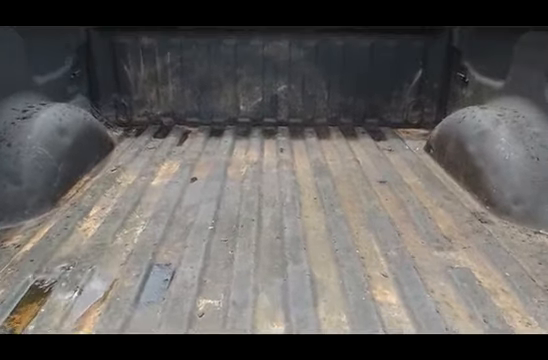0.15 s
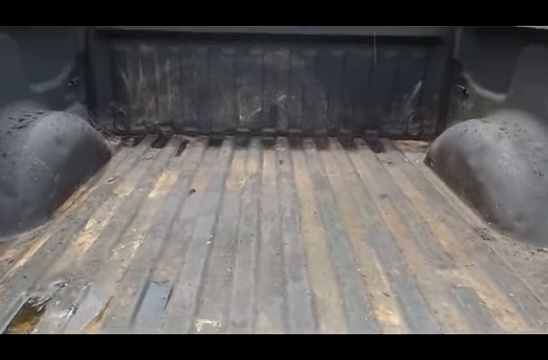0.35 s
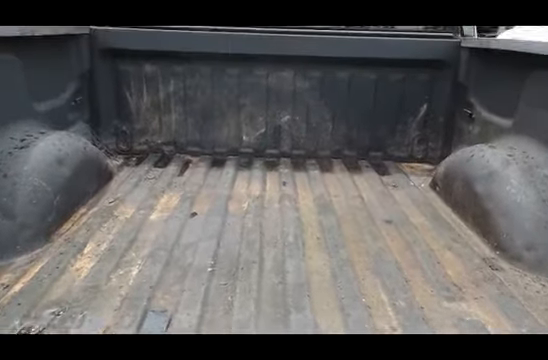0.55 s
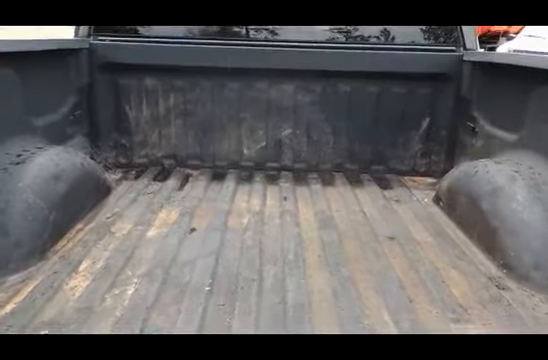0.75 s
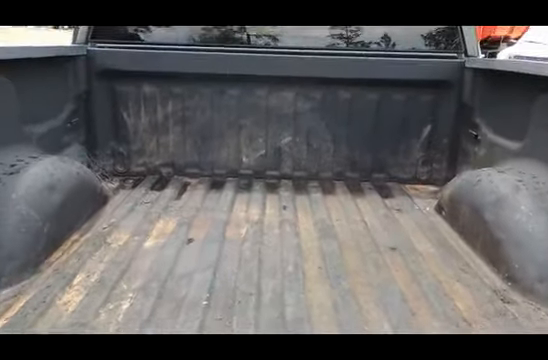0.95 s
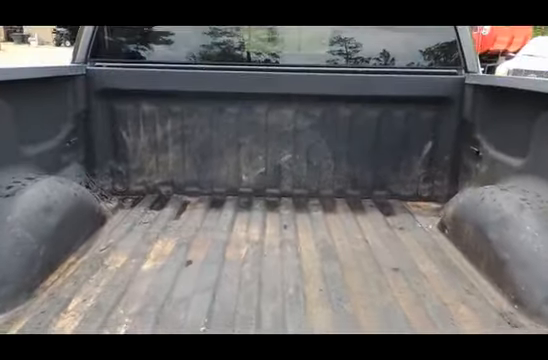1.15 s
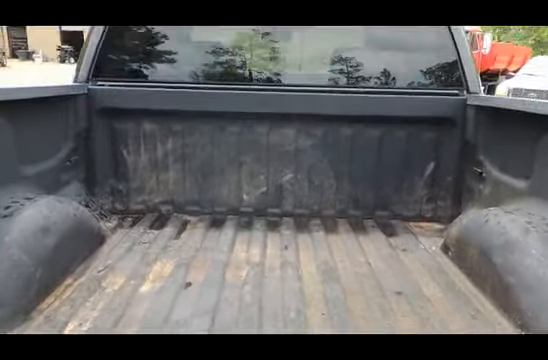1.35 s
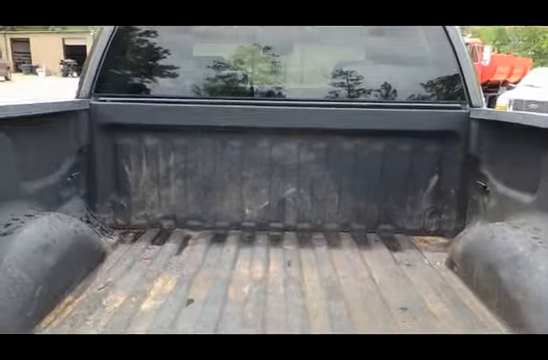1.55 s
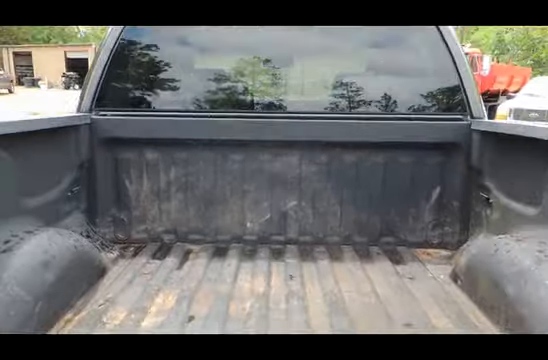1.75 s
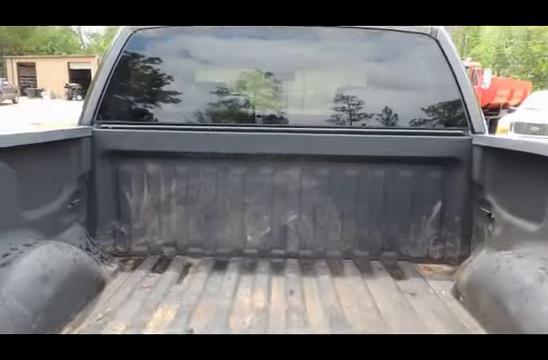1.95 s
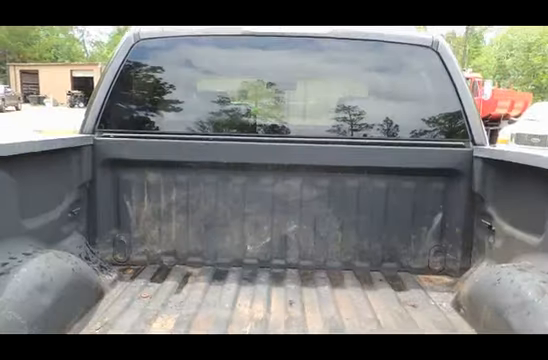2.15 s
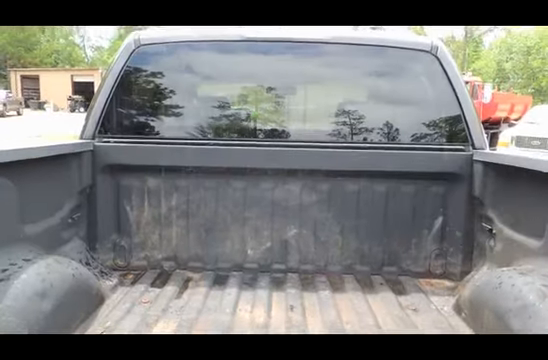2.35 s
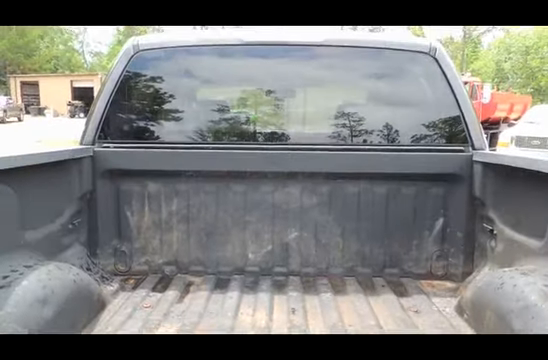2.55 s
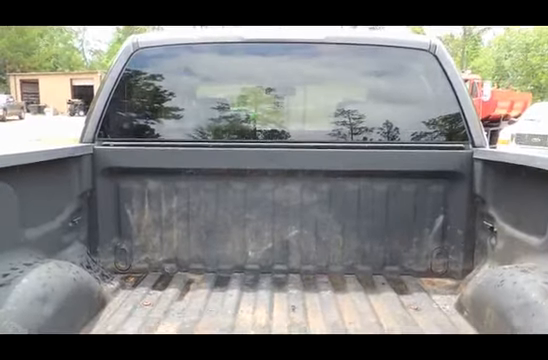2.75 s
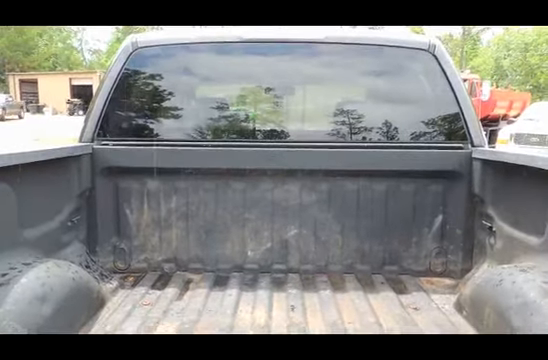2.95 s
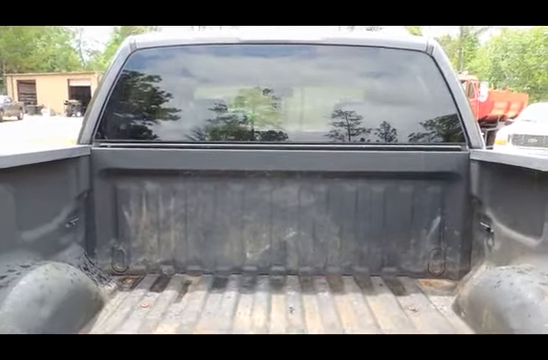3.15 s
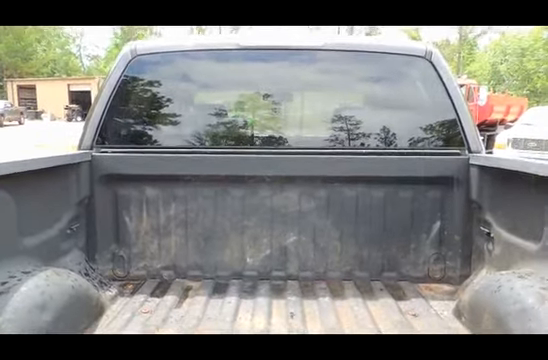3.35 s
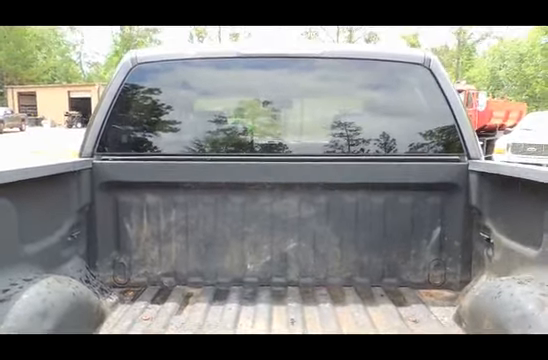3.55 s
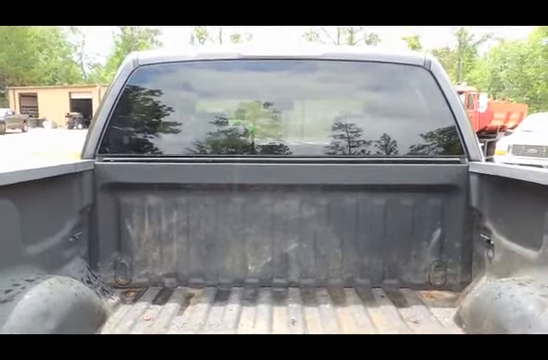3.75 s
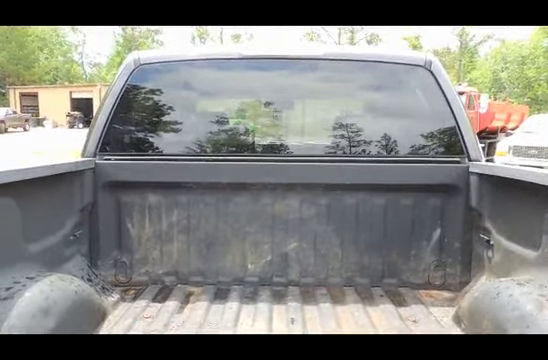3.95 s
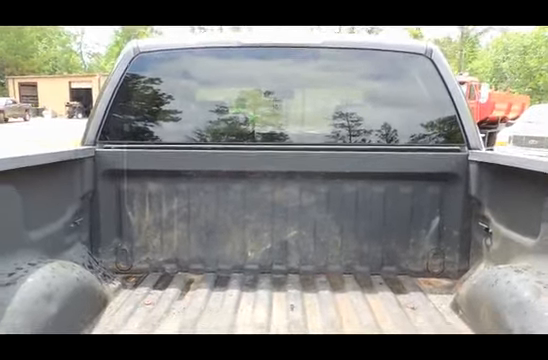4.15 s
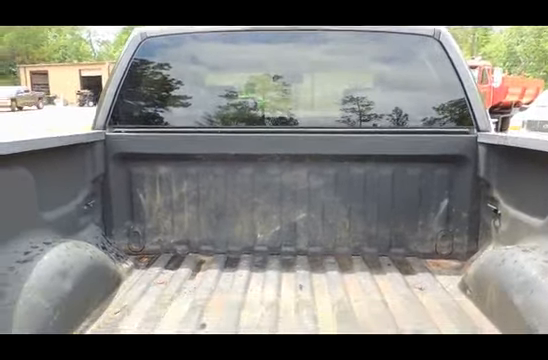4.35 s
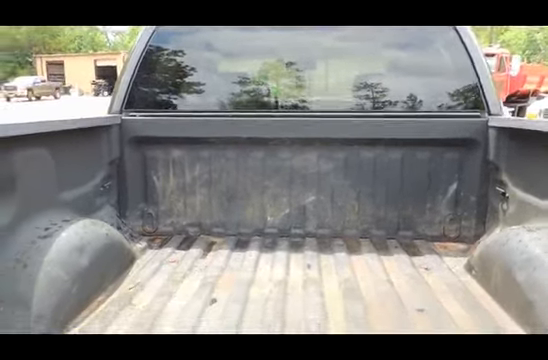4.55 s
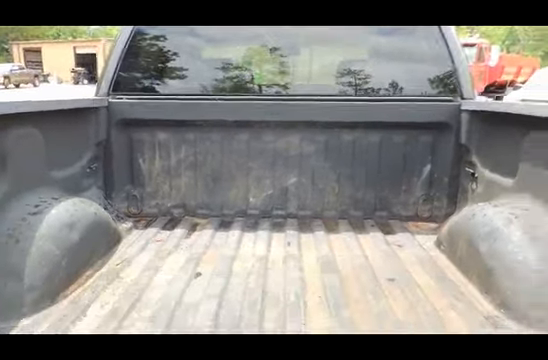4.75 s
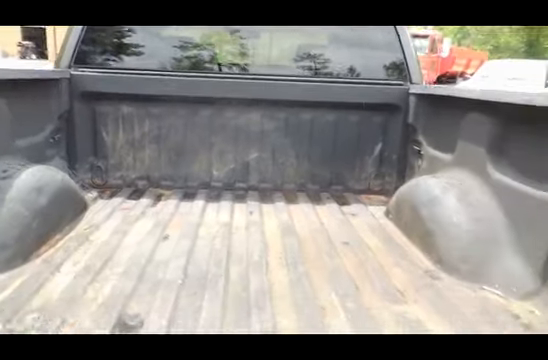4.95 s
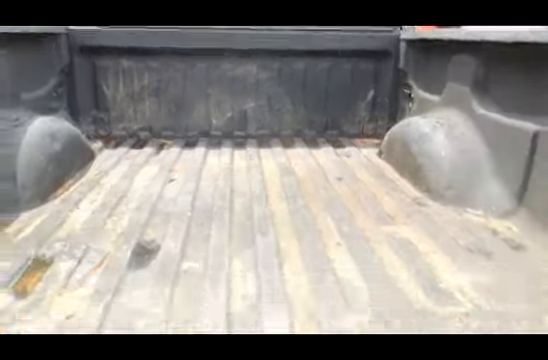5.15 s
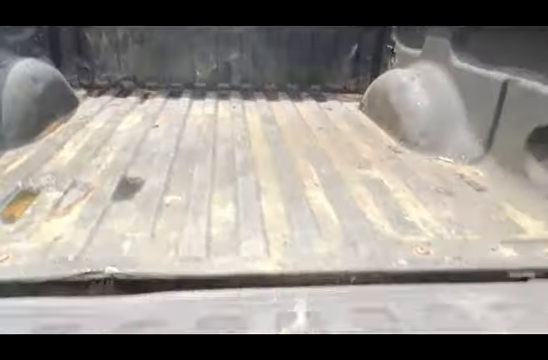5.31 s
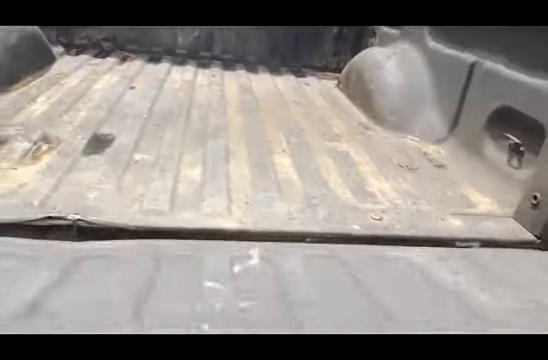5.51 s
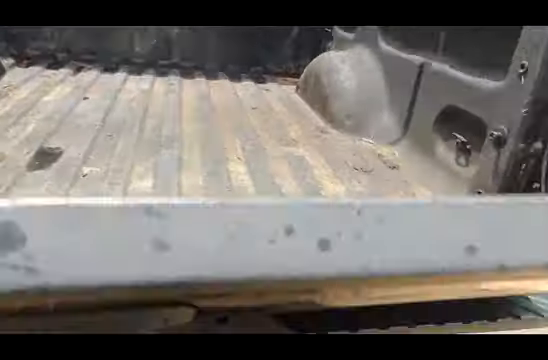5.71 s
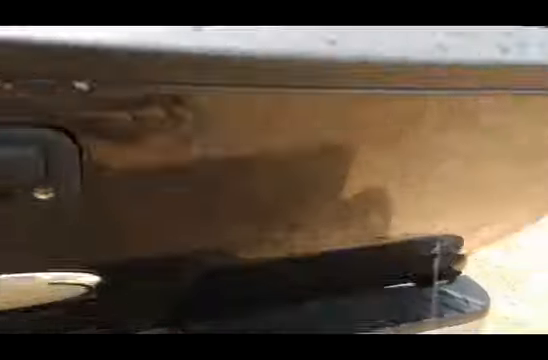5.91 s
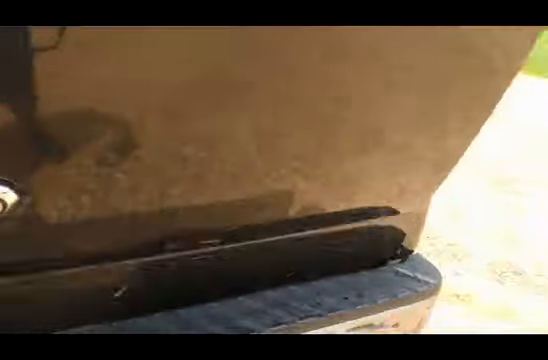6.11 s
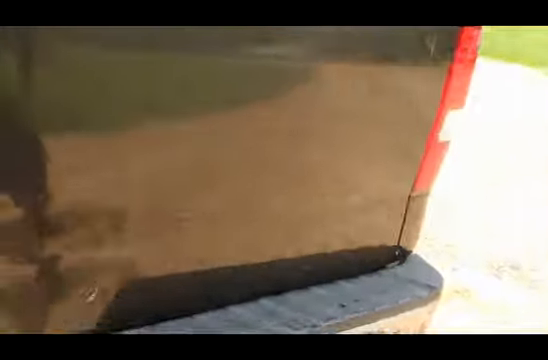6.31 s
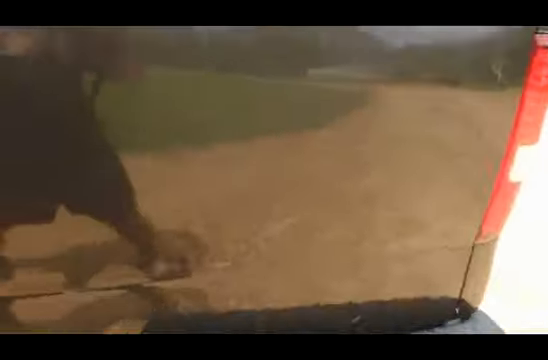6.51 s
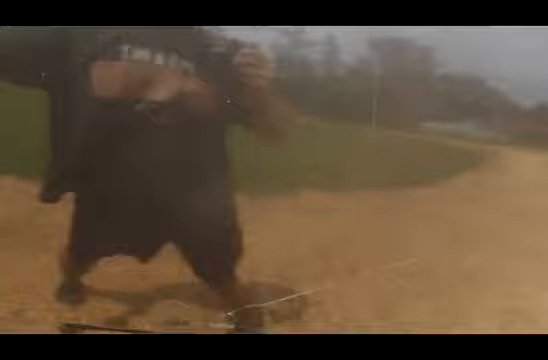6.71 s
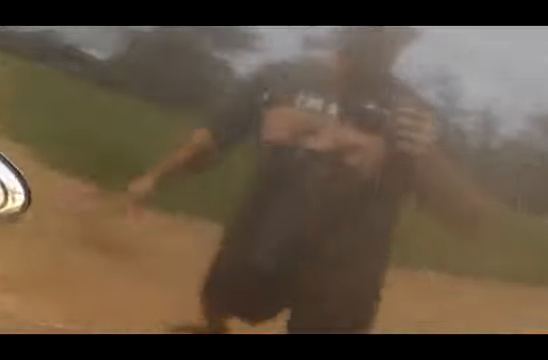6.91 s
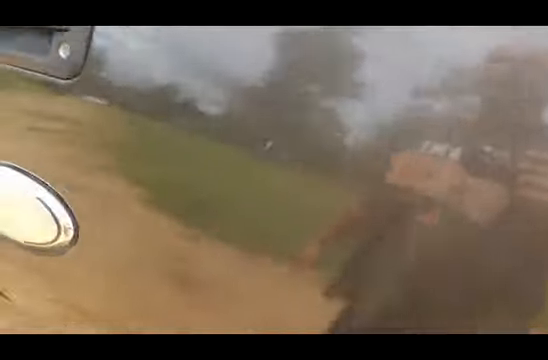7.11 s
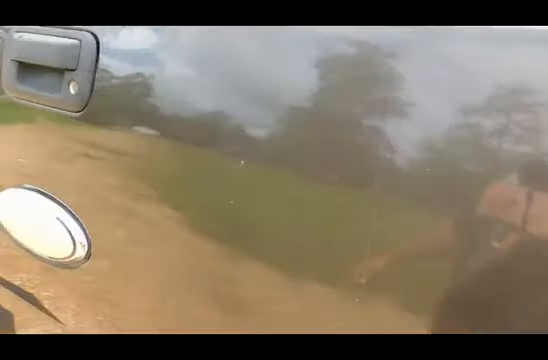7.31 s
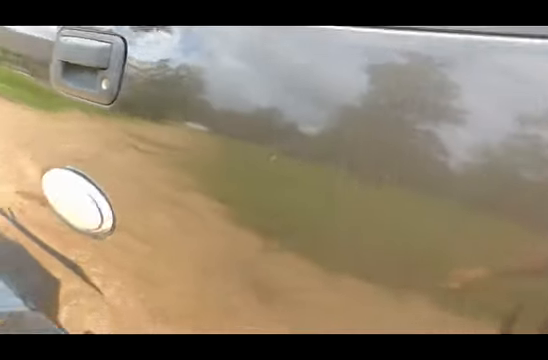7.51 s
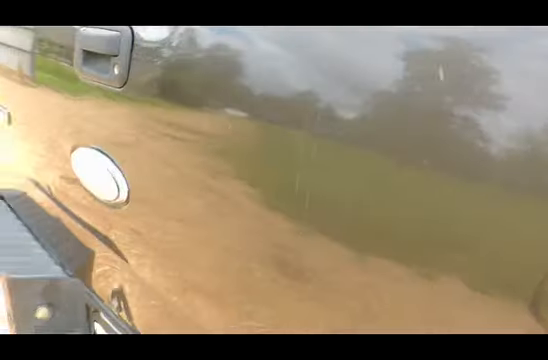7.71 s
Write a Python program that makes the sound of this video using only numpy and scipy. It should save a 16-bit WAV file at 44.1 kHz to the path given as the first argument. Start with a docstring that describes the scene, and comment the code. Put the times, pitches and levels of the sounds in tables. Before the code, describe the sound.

Quiet outdoor yard close to a small stereo microphone: distant traffic, leaves, low engine hum and echoing birds, with small handling ticks. After about five seconds the metal tailgate is knocked and swung up with hollow grinding and a thin squeak, then slams in a deafening, distorted clang with rattles. The background ducks afterward beneath rustles and sharp clicks.

```python
"""A pickup tailgate is knocked, swung up on grinding, squeaking hinges and slammed shut in an open yard.
Blows set its sheet-metal tones ringing, and the slam adds bursts of rattling noise.
Birds are gliding near-sine tones with echoes; traffic, leaves and an idling engine are noise and hum.
Close by, filtered noise makes ticks, rustles and scrapes, and slow pressure swings make puffs of air.
The bang overloads the small stereo microphone, whose gain control turns the sound down and recovers."""
import sys
import numpy as np
from scipy import signal
from scipy.io import wavfile
from scipy.ndimage import uniform_filter1d, minimum_filter1d

SR = 44100
rng = np.random.default_rng(int(sys.argv[2]) if len(sys.argv) > 2 else 0)


def attenuation_scalar(level_db):
    """Turn a level in dB into a linear amplitude multiplier (20 dB per decade)."""
    decades = np.asarray(level_db, float) / 20
    return 10 ** decades


def materialize(psi):
    """Save the field psi as 16-bit PCM at rate SR to the path in sys.argv[1].

    A 1-D psi becomes a single channel; in a 2-D psi each row is a channel.
    """
    bounded = np.clip(np.atleast_2d(psi).T, -1, 1)
    quanta = np.round(bounded * 32767).astype(np.int16)
    wavfile.write(sys.argv[1], SR, quanta)


N = 347067   # samples, about 7.87 s
PORT_LAG_S = .0001   # a sound from the side reaches the right microphone port this much later
TOP_HZ = 14350   # upper edge of the rustles; the microphone's band ends just above


def rms_one(x):
    """Scale to rms 1."""
    return x / np.sqrt(np.mean(x ** 2) + 1e-20)


def at_hz(points, hz):
    """Read a table's second column at a frequency, on a log frequency axis."""
    points = np.array(points)
    return np.interp(np.log(hz), np.log(np.maximum(points[:, 0], 1)), points[:, 1])


def level(rows):
    """Gain over time from (time [s], level [dB]) columns, fading to -100 dB outside the table."""
    rows = np.array(rows)
    s = np.r_[rows[0, 0] - .01, rows[:, 0], rows[-1, 0] + .01]
    return attenuation_scalar(np.interp(np.arange(N) / SR, s, np.r_[-100, rows[:, 1], -100]))


def drift(rate_hz):
    """Slow random wandering with spread 1, made at every 40th sample; a higher rate wanders faster."""
    r = np.exp(-80 * np.pi * rate_hz / SR)
    slow = signal.lfilter([1], [1, -2 * r, r * r], rng.standard_normal(N // 40 + 2002))[2000:]
    return np.interp(np.arange(N) / 40, np.arange(len(slow)), rms_one(slow - slow.mean()))


def band(x, low_hz, high_hz):
    """Keep only the sound between two frequencies (Butterworth band-pass)."""
    edges = [low_hz, min(high_hz, .45 * SR)]
    return signal.sosfilt(signal.butter(2, edges, "band", fs=SR, output="sos"), x + 1e-18)


def ring(clicks, hz, t60):
    """A unit click sets a sine of height 1 ringing, which falls by 60 dB in t60 seconds."""
    r, w = attenuation_scalar(-60 / (t60 * SR)), 2 * np.pi * hz / SR
    return signal.lfilter([0, np.sin(w)], [1, -2 * r * np.cos(w), r * r], clicks + 1e-18)


def ports(x):
    """A sound from one side reaches the right port a little later."""
    return np.array([x, np.interp(np.arange(N) - PORT_LAG_S * SR, np.arange(N), x)])


def blend(common, left, right, alike):
    """Stereo noise: a shared part, later on the right, plus a separate part for each port."""
    shared = np.array([common, np.roll(common, round(PORT_LAG_S * SR))])
    return alike * shared + np.sqrt(1 - alike ** 2) * np.array([left, right])


def banded(spectrum, likeness, envelope, size=N):
    """Half-octave bands of stereo noise, partly common to both ports; envelope(hz) shapes each band."""
    out, edges = np.zeros((2, size)), 22 * 2 ** np.arange(0, 10, .5)
    white = rng.standard_normal((2, 3, size))   # neighbouring bands use different noise
    for k, (low, high) in enumerate(zip(edges, edges[1:])):
        hz = np.sqrt(low * high)
        if spectrum[0][0] < hz < spectrum[-1][0] * 1.2:
            alike = np.clip(at_hz(likeness, hz), 0, 1)
            pair = blend(*band(white[k % 2], low, high), alike)
            out += attenuation_scalar(at_hz(spectrum, hz)) * envelope(hz) * pair
    return out


def glide(rows, waver=0.0041):
    """A near sine along (time [s], pitch [Hz], level [dB]) rows; its pitch wavers and its ends are soft."""
    s, hz, db = np.transpose(rows)
    start = int(s[0] * SR)
    t = np.arange(start, min(N, int(s[-1] * SR))) / SR
    jitter = 10 * uniform_filter1d(rng.standard_normal(len(t)), size=100)   # spread about 1
    pitch = np.interp(t, s, hz) * (1 + waver * jitter)
    ends = np.clip(np.minimum(t - s[0], s[-1] - t) / 0.0099, 0, 1)   # fades of 9.9 ms
    sine = np.sin(2 * np.pi * np.cumsum(pitch) / SR)
    out = np.zeros(N)
    out[start:][:len(t)] = np.sqrt(2) * attenuation_scalar(np.interp(t, s, db)) * ends * sine
    return out


# tone colour of the yard air: (frequency [Hz], relative level [dB per Hz])
AIR_SPECTRUM = [(15, -30), (26, -6), (52, -7), (75, 1), (104, -2.5), (147, -13), (219, -15), (383, -17),
                (515, -13.5), (740, -20.5), (1000, -12.5), (1460, -16), (2300, -19), (5280, -25),
                (12400, -30.5), (15000, -27)]
# how alike the yard air is at the two ports: (frequency [Hz], common share [0-1])
AIR_LIKENESS = [(30, 0.86), (70, 1), (300, 0.88), (1400, 0.91), (4000, 0.7), (14000, 0.17)]


def traffic():
    """Distant traffic and leaves are noise bands that swell together and flicker one by one."""
    together = drift(1.0)
    air = banded(AIR_SPECTRUM, AIR_LIKENESS, lambda hz: attenuation_scalar(0.58 * together + 1.4 * drift(15.0)))
    return attenuation_scalar(-39.5) * rms_one(air)


# fading of the broad tone in the far traffic: (time [s], level [dB])
DRONE_LEVEL = [(0, -55), (2.8, -53.5), (3.6, -82)]


def drone():
    """A broad tone in the far traffic is noise driving one heavily damped ring."""
    hum = ring(rng.standard_normal(N), hz=963, t60=0.071)
    return ports(level(DRONE_LEVEL) * rms_one(hum))


# low tones of the far engine: (pitch [Hz], level [dB])
ENGINE_TONES = [(59.2, -53.5), (113.0, -50.5)]


def engine():
    """The idling engine's low orders are sines that waver in pitch and level."""
    hum = np.zeros(N)
    for hz, db in ENGINE_TONES:
        loudness = attenuation_scalar(db + 2.7 * drift(2.4))
        turns = hz * np.cumsum(1 + 0.015 * drift(1.61)) / SR
        hum += np.sqrt(2) * loudness * np.sin(2 * np.pi * turns)
    return hum


# close ticks and crunches: (time [s], peak level [dB], centre frequency [Hz])
TICKS = [(0.0888, -28, 1240), (0.942, -25.5, 1200), (1.0298, -28, 1200), (1.2, -29.5, 1300),
         (1.4483, -26.5, 1200), (1.7798, -28, 1160), (1.884, -34, 1200), (3.152, -16.5, 6150),
         (3.3962, -26, 2480), (4.157, -26, 6940), (4.2284, -13.5, 12000), (4.3816, -30, 1507),
         (4.7616, -22, 796), (4.991, -20, 7000), (5.0863, -41.5, 1500), (5.1504, -25, 5970),
         (5.152, -22.5, 980), (5.272, -14, 5200), (5.6194, -18.5, 6760), (6.0382, -19, 6000),
         (6.2771, -14, 4160), (6.327, -27, 3000), (6.6926, -16, 13870), (6.7095, -23, 4000),
         (6.722, -21.5, 10000), (7.0205, -18, 7450), (7.1142, -23, 9100), (7.184, -31.5, 1510),
         (7.333, -24, 11000), (7.352, -24, 4000), (7.3655, -23, 6920), (7.3766, -15, 6860),
         (7.4107, -7, 10440), (7.434, -18, 7010), (7.6324, -23.5, 10800), (7.648, -14.5, 11900),
         (7.672, -6, 11800), (7.687, -6, 11800), (7.6962, -18, 11800), (7.7082, -10, 5700),
         (7.7155, -3, 6600), (7.765, -15, 6360), (7.8093, -9.5, 11770), (7.8153, -10, 5740),
         (7.8285, -11, 8540), (7.8401, -7, 7500), (7.8446, -2.5, 9550), (7.8514, -19, 8830),
         (7.8654, -17, 4300)]


def ticks(count=24):
    """Each tick is a few ms of noise, a snap over a dull tap, dying fast; faint strays fall at random."""
    out, t = np.zeros((2, N + 2000)), np.arange(2000) / SR
    rows = list(TICKS)
    for when, size, pitch in rng.random((count, 3)):
        rows.append((when * N / SR, -35 + 4 * (2 * size - 1), 1100 * 6.5 ** pitch))
    for s, db, hz in rows:
        noise = rng.standard_normal((2, 2000))
        noise[1] = .6 * np.roll(noise[0], round(PORT_LAG_S * SR)) + .8 * noise[1]
        t60 = max(0.0078 + 14 / hz, .002)   # a fixed time plus 14 cycles
        snap = band(noise * attenuation_scalar(-60 * t / t60), hz * 0.51, hz * 1.52)
        tap = band(noise * attenuation_scalar(-60 * t / (2.2 * t60)), 620, 3260)
        for part, peak_db in (snap, db), (tap, db - 19):
            peak = np.abs(part).max(axis=1, keepdims=True)
            out[:, round(s * SR):][:, :2000] += attenuation_scalar(peak_db) * part / peak
    return out[:, :N]


# thin high whistles: (time [s], length [s], lowest pitch [Hz], level [dB])
WHISTLES = [(0.184, 0.26, 7290, -54.5), (1.883, .32, 7050, -47.5), (2.502, .33, 7050, -44.5),
            (3.301, 0.37, 7050, -51), (4.032, 0.34, 6990, -50.5), (4.57, .5, 6910, -49.5),
            (6.47, 0.36, 6850, -51.5), (7.266, 0.26, 6830, -43.5)]


def whistles():
    """Each drops in from above, sags to its lowest pitch halfway and lifts away; the level flutters."""
    drop_hz, drop_s, sag_hz = 501, .045, 92.6
    lift_hz, fade_s, ends_db = 196.5, 0.0496, -8
    out = np.zeros(N)
    for s, length, hz, db in WHISTLES:
        out += glide([(s, hz + drop_hz, db + ends_db),
                      (s + drop_s, hz + sag_hz, db),
                      (s + length / 2, hz, db + 2.5),
                      (s + length - fade_s, hz + lift_hz, db),
                      (s + length, hz + 2 * lift_hz, db + ends_db)])
    return attenuation_scalar(3.6 * drift(15.0)) * out


# slurred notes: (time [s], length [s], first pitch [Hz], middle pitch [Hz], last pitch [Hz], level [dB])
SLURS = [(0.199, .08, 2970, 2750, 2780, -49), (0.414, 0.043, 2630, 2950, 3200, -44),
         (0.812, 0.064, 2880, 2926, 2670, -43), (1.8, 0.18, 5800, 5970, 5940, -52),
         (1.87, 0.044, 2800, 2950, 2800, -49), (2.362, 0.061, 2670, 2720, 3240, -42),
         (2.511, .09, 2930, 2647, 2630, -43), (2.686, 0.093, 2580, 2680, 3120, -46),
         (3.151, .07, 2600, 2860, 2900, -47), (3.25, 0.039, 2690, 2640, 2650, -47),
         (3.488, .08, 2950, 2570, 2570, -47), (3.727, .04, 3430, 3000, 3150, -47),
         (3.994, 0.047, 3300, 3450, 2900, -41), (4.308, 0.033, 3440, 3400, 3000, -41),
         (4.56, 0.07, 2640, 3250, 3040, -45), (4.916, 0.035, 3190, 3260, 3030, -44)]


def slurs(count=22):
    """Short notes slide through three pitches; further birds slur faintly at random moments."""
    from_s, to_s, low_hz, high_hz = 3.2, 5.1, 3000, 4250   # range of the random notes
    rows = list(SLURS)
    for when, pitch, bend, size in rng.random((count, 4)):
        s = from_s + (to_s - from_s) * when
        hz = low_hz + (high_hz - low_hz) * pitch ** 2
        middle_hz = hz * (1 + 0.12 * (2 * bend - 1))
        rows.append((s, .05, hz, middle_hz, hz * 1.4, -45 - 5 * size))
    out, ends_db = np.zeros(N), -5.5   # quieter at both ends
    for s, length, first, middle, last, db in rows:
        out += glide([(s, first, db + ends_db), (s + length / 2, middle, db),
                      (s + length, last, db + ends_db)])
    return out


# three notes of one song phrase, each a list of: (time after start [s], pitch [Hz], relative level [dB])
PHRASE = [
    [(0, 2920, -16), (.022, 2446, -0.5), (.042, 2420, -11)],
    [(.045, 2504, -10), (.065, 2883, -3.5), (.088, 3040, -21)],
    [(.145, 2400, -28), (.157, 2334, -3.5), (.175, 1920, -25)],
]
# when the phrase is sung: (time [s], level [dB])
PHRASE_STARTS = [(3.324, -37.5), (3.616, -35.5), (3.906, -35.5), (4.206, -33.5), (4.501, -32.5),
                 (4.809, -34)]


def birds():
    """Whistles, slurs and a repeated phrase, with scattered echoes off trees and walls."""
    calls = whistles() + slurs()
    for start, db in PHRASE_STARTS:
        for note in PHRASE:
            calls += glide([(start + s, hz, db + part) for s, hz, part in note])
    t = np.arange(SR // 2) / SR
    returns = rng.random((2, len(t))) < 400 / SR   # about 400 echoes a second
    scatter = rng.standard_normal((2, len(t))) * returns * attenuation_scalar(-60 * t / 0.83)
    scatter = band(scatter / np.sqrt(np.sum(scatter ** 2, axis=1, keepdims=True)), 500, 7500)
    echoes = signal.fftconvolve(calls[None], scatter, axes=1)[:, :N]
    return ports(calls) + attenuation_scalar(-5.5) * echoes


# bright rustles of cloth, skin and grit: (start [s], end [s], level [dB], lowest frequency [Hz])
RUSTLES = [(0.308, .527, -51, 9500), (4.155, 4.27, -45.5, 2940), (4.65, 4.882, -47, 10500),
           (5.103, 5.23, -46.5, 5000), (5.443, 5.573, -42, 9500), (5.57, 5.649, -42.5, 4800),
           (5.777, 6.11, -42.5, 10400), (5.828, 6.266, -41.5, 2380), (6.081, 6.19, -37.5, 2820),
           (6.767, 6.87, -40, 2000), (6.906, 7.038, -35, 1980), (7.329, 7.458, -35, 3840),
           (7.447, 7.766, -37.5, 3200), (7.616, 7.666, -30, 8400), (7.674, 7.738, -25, 4060),
           (7.803, 7.89, -35, 3500)]
# dull scrapes of hand, gate and shoe: (start [s], end [s], level [dB])
SCRAPES = [(5.051, 5.228, -41.5), (5.563, 5.663, -42.5), (5.658, 5.925, -38.5), (6.051, 6.194, -36),
           (6.188, 6.368, -44), (6.907, 7.042, -39.5), (7.332, 7.625, -39)]
# how alike close sounds are at the two ports, also for the clashes: (frequency [Hz], common share [0-1])
NEAR_LIKENESS = [(300, 0.88), (1000, 1), (3000, 0.06), (12000, 0.25)]


def scuffs():
    """Each stroke is grainy noise in its band, starting quickly and easing off."""
    out = np.zeros((2, N + SR))
    grain = rms_one(attenuation_scalar(2.2 * drift(110.0) + 0.5 * drift(40.0)))
    catches = attenuation_scalar(1.93 * drift(38.0))   # dull scrapes catch and slip
    strokes = [(start, end, db, low_hz, TOP_HZ * 1.1, False) for start, end, db, low_hz in RUSTLES]
    strokes += [(start, end, db, 537, 1630 * 1.1, True) for start, end, db in SCRAPES]
    for start, end, db, low_hz, high_hz, is_scrape in strokes:
        first = int(start * SR)
        t = np.arange(int((end - start) * SR)) / SR
        noise = rng.standard_normal((3, SR // 2))
        noise = band(band(noise, low_hz, high_hz), low_hz, high_hz)[:, :len(t)]   # twice, for steep edges
        alike = np.clip(at_hz(NEAR_LIKENESS, low_hz * 0.79), 0, 1)
        pair = blend(*noise, alike)
        shape = np.clip(t / 0.0017, 0, 1) * np.clip((t[-1] - t) / 0.0094, 0, 1)
        catch = catches[first:][:len(t)] if is_scrape else 1
        out[:, first:][:, :len(t)] += attenuation_scalar(db) * shape * rms_one(pair * catch)
    return out[:, :N] * grain


# puffs of air on the ports: (time [s], level [dB], left minus right [dB])
PUFFS = [(0.927, -32, 16), (7.131, -16.5, -17)]


def puffs():
    """Each puff is a lone lump of one and a half slow pressure swings."""
    out = np.zeros((2, N))
    for s, db, pan_db in PUFFS:
        t = np.arange(N) / SR - s - .012   # the lump peaks 12 ms after its time
        sides = attenuation_scalar(db + pan_db / 2 * np.array([[1], [-1]]))
        out += sides * np.exp(-(t / 0.0096) ** 2) * np.cos(2 * np.pi * 45 * t)
    return out


# ringing tones of the sheet-metal gate and bed: (pitch [Hz], relative level [dB], undamped t60 [s])
GATE_MODES = [(60.3, -8, 0.73), (78.5, -3.5, 0.34), (108, -3, 0.52), (131.3, -2.5, 0.16), (149.9, -3, 0.4),
              (161.5, -10.5, 0.57), (181.1, -5, 0.57), (197.8, 2.5, 0.21), (227.5, -12, 0.41),
              (259.7, -6, 0.26), (295.3, -3, 0.74), (329.2, 2, 0.42), (352.4, -9.5, 0.44),
              (379.5, -3, 0.27), (421, -10, 0.7), (480, -4, 0.45), (535, -3, 0.29), (671, -2, 0.56),
              (750, 1.5, 0.54), (820, 6, 0.93), (910, 13, 0.34), (1124, 1, 0.18), (1050, 3, 0.38),
              (1150, -5, .2), (1320, -16, .15)]
# blows on the gate: (time [s], level [dB], loudest region [Hz])
BLOWS = [(4.761, -19, 163), (4.763, -35, 970), (4.825, -21.5, 132), (5.35, -37, 334), (5.549, -16.5, 125),
         (5.56, -23, 480), (5.799, -23.5, 567), (6.04, -28.5, 1320), (6.168, -19.5, 300),
         (6.397, -12.5, 1030), (6.412, 12.5, 190), (6.444, 7, 326), (6.455, 11.5, 190), (6.472, 10.5, 160),
         (6.49, 5.5, 150), (6.514, 9.5, 180), (6.556, -18, 330), (6.6, -11, 325), (6.629, -5.5, 198)]


def blows():
    """Each blow is a soft push that rings the gate's modes, most of all those near its loudest region."""
    pushes = np.zeros((len(BLOWS), N))
    n = np.arange(2000)
    for push, (s, db, region_hz) in zip(pushes, BLOWS):
        r = np.exp(-2 * np.pi * 3.2 * region_hz / SR)   # the push is dull above 3.2 times the region
        push[round(s * SR):][:2000] = attenuation_scalar(db) * (1 - r) ** 2 * (n + 1) * r ** n
    mode_hz = np.array(GATE_MODES)[:, 0]
    blow_db, region_hz = np.array(BLOWS)[:, 1:2], np.array(BLOWS)[:, 2:]
    focus_db_oct = np.maximum(13.5 - 0.34 * blow_db, 0)   # harder blows spread wider
    strength = attenuation_scalar(rng.normal(0, 1.5, (len(BLOWS), len(mode_hz)))) * (-1) ** np.arange(len(mode_hz))
    strength *= attenuation_scalar(-focus_db_oct * np.abs(np.log2(mode_hz / region_hz)))   # where it is struck
    out = np.zeros(N)
    for k, (hz, db, t60) in enumerate(GATE_MODES):
        damped_s = min(t60, 190 / hz)   # the bed liner damps any ring beyond some 190 cycles
        buzz = attenuation_scalar(db - 6.0 + 3.6 * drift(22.0))   # loose panels buzz, so each ring wavers
        out += buzz * ring(strength[:, k] @ pushes, hz, damped_s)
    return ports(out)


# air stirred by the swinging gate and the moving microphone: (time [s], level [dB])
BUFFET_LEVEL = [(4.9, -54), (5.4, -43.5), (5.95, -56), (6.1, -34.5), (6.35, -33), (6.5, -18), (6.68, -18),
                (6.88, -29.5), (7.3, -33), (7.87, -43)]


def buffet():
    """Stirred air is lumpy low noise, mostly alike at both ports."""
    common, left, right = band(rng.standard_normal((3, N)) * attenuation_scalar(2.0 * drift(33)), 19, 150)
    return level(BUFFET_LEVEL) * rms_one(common + 0.5 * np.array([left, right]))


# the gate grinds on its pivots: (time [s], level [dB], loudest region [Hz])
SWING = [(5.5, -44, 184), (5.566, -32, 201), (5.66, -38.5, 253), (5.78, -36, 430), (5.93, -39.5, 312),
         (6.1, -32, 322), (6.18, -29.5, 296), (6.3, -30, 272), (6.39, -39, 180)]


def pivots():
    """Stick-slip: uneven slips ring the gate's modes, hardest near the moving loudest region."""
    slips = rng.standard_normal(N) * (rng.random(N) < 250 / SR) * attenuation_scalar(2.3 * drift(31))
    s, _, region_hz = np.transpose(SWING)
    moving_hz = np.interp(np.arange(N) / SR, s, region_hz)
    ground = np.zeros(N)
    for hz, _, t60 in GATE_MODES:
        nearness = attenuation_scalar(-12 * np.abs(np.log2(hz / moving_hz)))
        ground += ring(slips * nearness, hz, t60 * 0.46)
    evened = ground / np.sqrt(uniform_filter1d(ground ** 2, size=3000) + 1e-12)
    return ports(level(SWING) * evened)


# path of the hinge squeak: (time [s], pitch [Hz], level [dB])
SQUEAK = [(5.815, 11900, -49), (5.84, 12640, -42), (5.865, 13300, -46), (5.905, 13850, -48),
          (5.965, 13150, -42), (6.025, 13600, -41), (6.05, 13200, -43), (6.095, 11100, -54)]
# tones sounding together in the squeak: (pitch ratio, relative level [dB])
SQUEAK_PARTS = [(1.0, 0.0), (.952, -3.0), (.84, -5.0)]


def hinge():
    """The dry hinge sings on a few rough high tones that glide together."""
    out = np.zeros(N)
    for ratio, part_db in SQUEAK_PARTS:
        tone = glide([(s, hz * ratio, db + part_db) for s, hz, db in SQUEAK], waver=.004)
        out += tone * attenuation_scalar(3.0 * drift(25))
    return ports(out)


# latch and loose parts clashing in the slam: (time [s], relative level [dB])
CLASHES = [(6.3967, -6.5), (6.4022, 2.5), (6.4186, 7), (6.4247, 8.5), (6.44, 5), (6.452, 7.5), (6.4704, -1),
           (6.488, -0.5), (6.507, -4.5), (6.553, -9.5)]
# tone colour of a clash: (frequency [Hz], relative level [dB per Hz])
CLASH_SPECTRUM = [(260, -46), (450, -1.5), (587, -9.5), (743, 10), (873, -14), (997, -5), (1600, -9.5),
                  (2880, -10.5), (4050, -16.5), (13000, -15), (15200, -13)]
# how long the rattle lasts: (frequency [Hz], t60 [s])
CLASH_DECAY = [(450, 0.52), (1000, 0.24), (3000, 0.18), (12000, 0.092)]


def clashes():
    """Every clash is a sharp noise burst, then a dense rattle that dies fastest in the treble."""
    start, size = round(CLASHES[0][0] * SR) - 100, SR
    hits = np.zeros(size)
    for s, db in CLASHES:
        hits[round(s * SR) - start] = attenuation_scalar(db)

    def dying(hz):
        """Level of the bursts and their tails, whose powers add."""
        burst = signal.lfilter([1], [1, -attenuation_scalar(-120 / (0.025 * SR))], hits ** 2)
        tail = signal.lfilter([1], [1, -attenuation_scalar(-120 / (at_hz(CLASH_DECAY, hz) * SR))], hits ** 2)
        return np.sqrt(burst + attenuation_scalar(-14.5) * tail)

    out = np.zeros((2, N))
    out[:, start:start + size] = banded(CLASH_SPECTRUM, NEAR_LIKENESS, dying, size=size)
    return attenuation_scalar(11.0) * out


def scene():
    """All sources at the two microphone ports, the left one stronger."""
    background = traffic() + drone() + engine() + birds()
    close = ticks() + scuffs() + puffs() + buffet()
    tailgate = blows() + pivots() + hinge() + clashes()
    left_db = 1.8   # left over right
    return (background + close + tailgate) * attenuation_scalar([[left_db / 2], [-left_db / 2]])


def top_cut(x):
    """Nothing passes above the cut-off."""
    return signal.sosfilt(signal.butter(12, 15390, fs=SR, output="sos"), x)


def record(dry):
    """Band limit, then a gain control too slow for the bang, so the converter clips."""
    threshold_db, duck_share = -5, 0.57   # share of the excess that is turned down
    attack_s, hold_s, release_db_s = 0.095, 0.51, 26
    dry = signal.sosfilt(signal.cheby2(14, 50, TOP_HZ + 250, fs=SR, output="sos"), dry)
    t, hold = np.arange(N) / SR, 2 * int(hold_s * SR / 2) + 1
    loudness_db = 20 * np.log10(np.abs(dry).max(axis=0) + 1e-9)
    over_db = np.maximum(loudness_db - threshold_db, 0)
    over_db = -minimum_filter1d(-over_db, size=hold, origin=hold // 2)   # the cut is held, then let go
    held_db = np.maximum.accumulate(duck_share * over_db + release_db_s * t) - release_db_s * t
    r = np.exp(-1 / (attack_s * SR))
    cut_db = signal.lfilter([1 - r], [1, -r], held_db)   # the cut sets in gradually
    ducked = dry * attenuation_scalar(-cut_db)
    clipped = ducked / (1 + np.abs(ducked / 1.03) ** 5) ** (1 / 5)   # rounded clipping towards 1.03
    return top_cut(clipped)


dry = scene()
out = record(dry)
materialize(out)
```